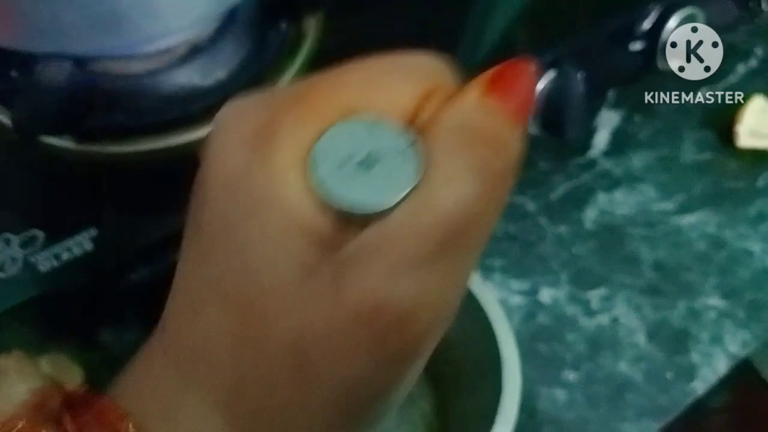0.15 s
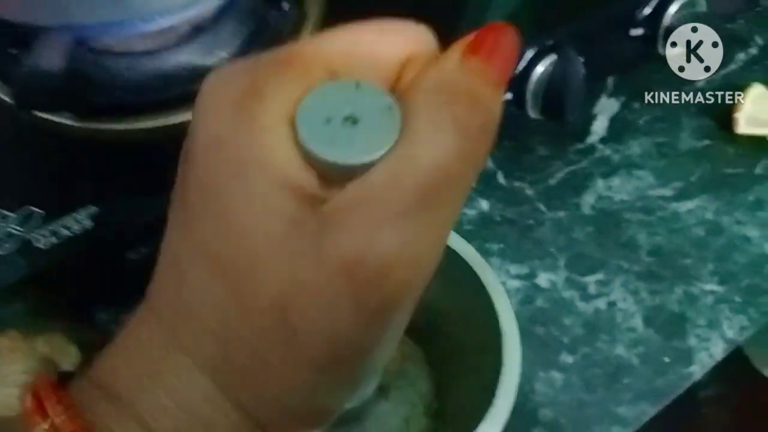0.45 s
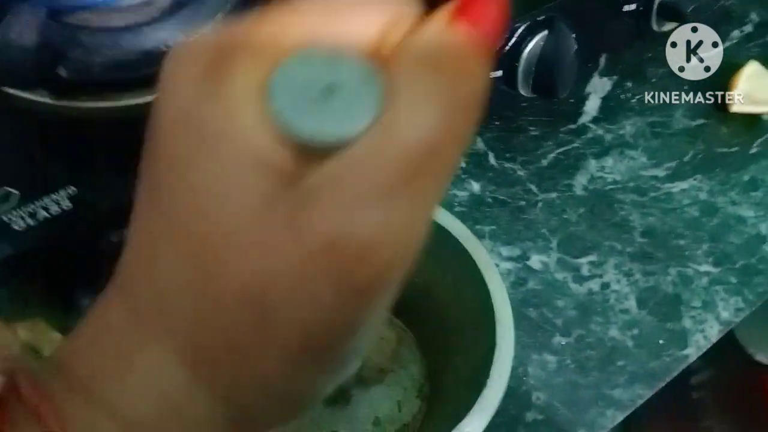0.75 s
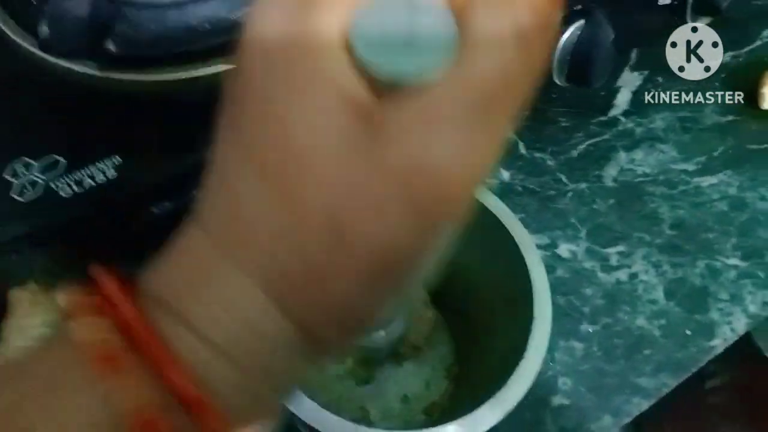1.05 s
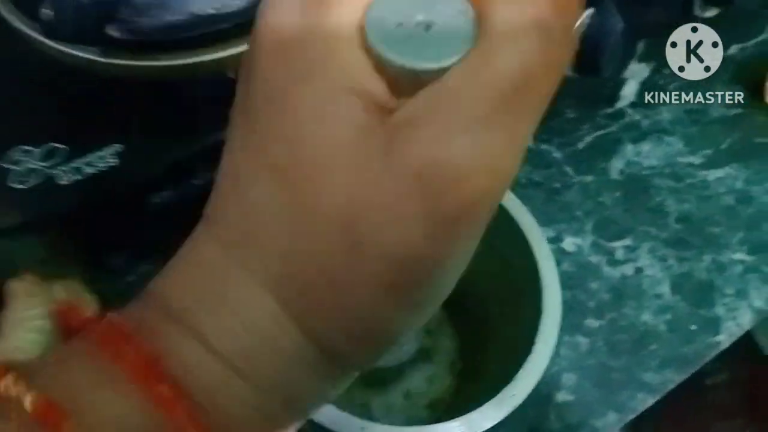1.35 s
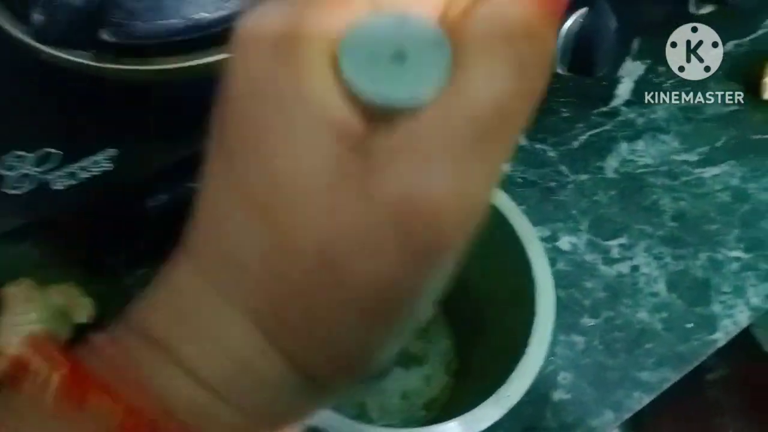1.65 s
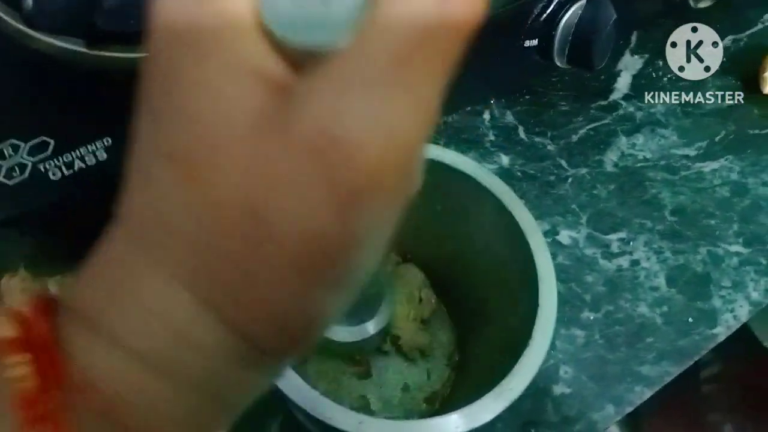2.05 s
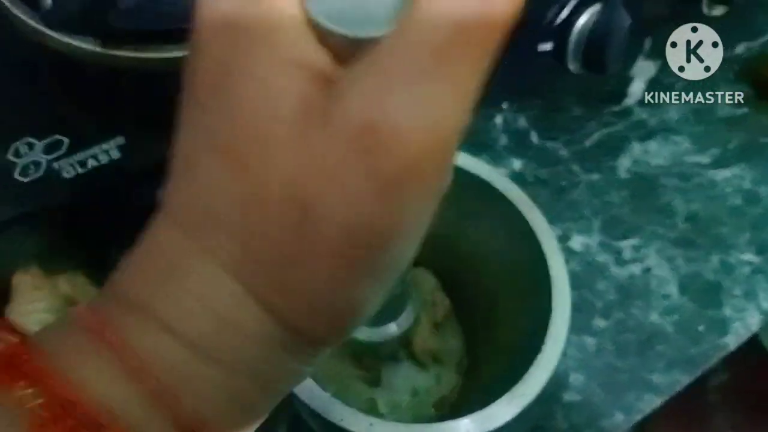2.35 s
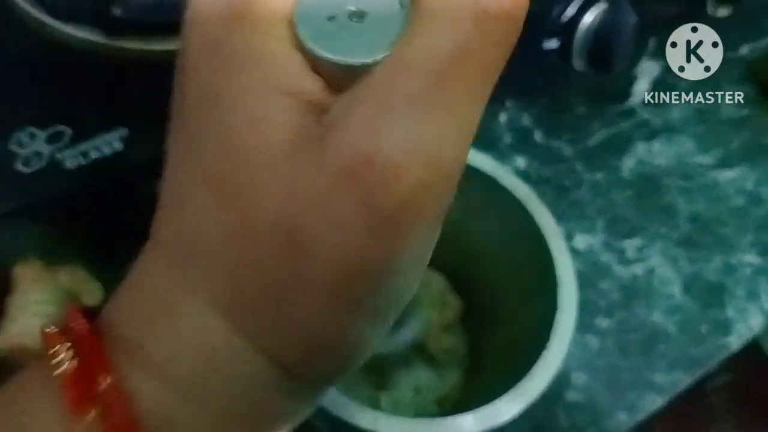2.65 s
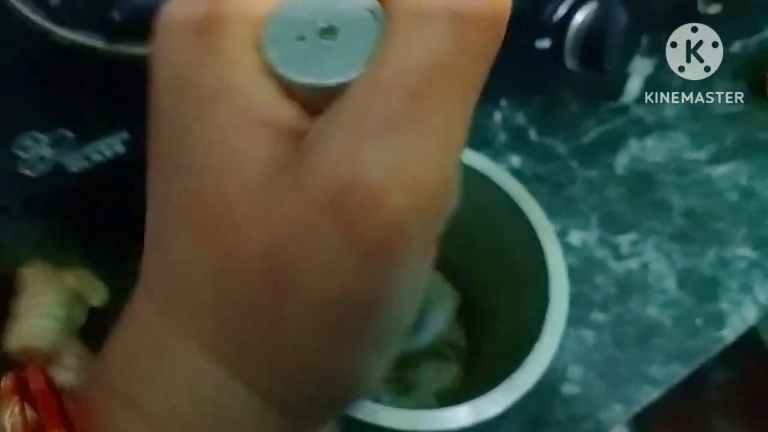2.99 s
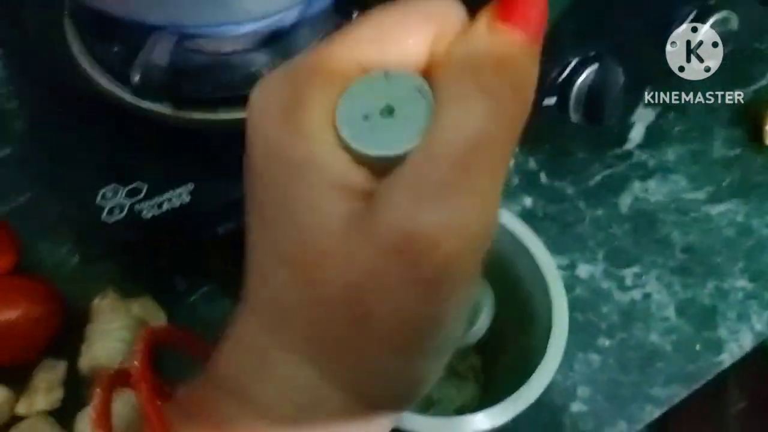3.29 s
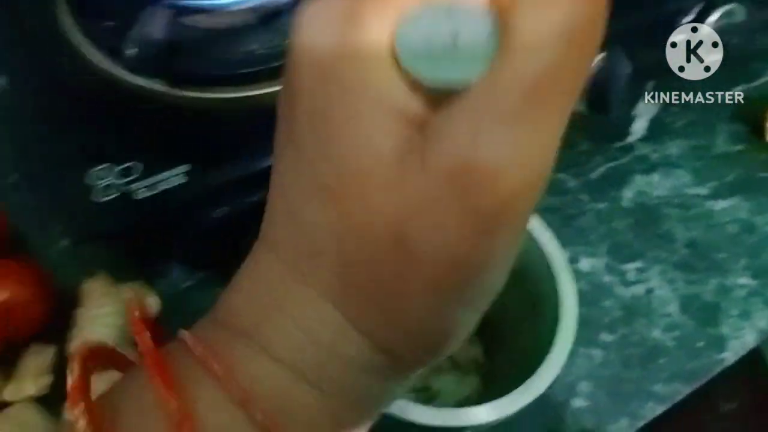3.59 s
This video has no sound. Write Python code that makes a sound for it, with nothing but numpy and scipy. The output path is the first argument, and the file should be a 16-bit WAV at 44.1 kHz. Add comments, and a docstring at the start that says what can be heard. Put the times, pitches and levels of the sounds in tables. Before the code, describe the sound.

Pestle blows knock and crunch ginger in a mortar, three a second, in a hard-walled kitchen

```python
"""Pounding ginger in a kitchen

A metal pestle pounds ginger in a metal mortar on a stone counter, about three blows a second.
Each blow is a noisy crunch of a few milliseconds, then a clack and the fading tones of mortar, base and counter.
Bangles on the pounding wrist clink as sets of high fading tones; a rub and short faint ticks are shaped noise.
Decaying noise gives the echo of the hard-walled kitchen, and a steady soft noise makes its background hush."""
import sys
import numpy as np
from scipy import signal
from scipy.fft import rfft, irfft
from scipy.io import wavfile
from scipy.ndimage import uniform_filter1d

SR = 44100
rng = np.random.default_rng(int(sys.argv[2]) if len(sys.argv) > 2 else 0)


def pcm_store(signal):
    """Save signal as 16-bit PCM."""
    levels = np.round(np.clip(np.atleast_2d(signal), -1, 1) * 32767)
    wavfile.write(sys.argv[1], SR, levels.astype(np.int16).T)


N = 165375
T = np.arange(SR) / SR   # one second of time, in s

# All mode and spectrum levels below are relative; each sound is scaled afterwards.
# background hush, spectrum: f/Hz, level per Hz/dB
HUSH_SPECTRUM = [(25, -22), (50, -7), (80, 5.5), (200, 6), (400, 4.5), (900, -2.5), (2000, -9), (4000, -15),
                 (6000, -23.5), (8300, -16), (10500, -27.5), (15000, -24.5)]
# kitchen echo: f/Hz, level against the direct sound/dB, time to fall 60 dB/s
ROOM = [(70, -10.5, 0.59), (176, -12, 0.6), (365, 3, .56), (670, -3, 0.41), (1270, -0.5, 0.37),
        (2363, 1, 0.48), (3000, -.5, 0.5), (4100, -8.5, 0.4), (5770, -15, 0.28), (8200, -9.5, 0.33),
        (14000, -13.5, 0.12)]
# modes (natural tones) of the counter: f/Hz, level/dB, time to fall 60 dB/s
COUNTER_MODES = [(79.5, -10, 0.53), (108.5, -10, 0.65), (128.4, -3.5, 0.428), (146.7, 3, 0.31),
                 (187.37, -2, 0.65), (205.7, -10.5, 0.55)]
# modes of the mortar's base against the counter: f/Hz, level/dB, time to fall 60 dB/s
BASE_MODES = [(196.3, -1, 0.21), (275, -3, 0.14), (320.6, 0.5, 0.11), (363, -6.5, 0.092), (415.4, -7, 0.17),
              (478.6, -3, 0.064)]
# modes of the mortar, damped by ginger and hand: f/Hz, level/dB, time to fall 60 dB/s
MORTAR_MODES = [(616.6, 6, 0.02), (738, 9.5, 0.018), (844, -2, 0.044), (929.6, -7, 0.054),
                (1009, 0.5, 0.037), (1250, -15, 0.076), (1257, -8, 0.052), (1597, -14, 0.069),
                (1852, -8.5, 0.2), (2050, -4.5, 0.04), (2257, 2.5, 0.013), (2680, -8.5, 0.038),
                (2976, -3.5, 0.019), (3500, -9.5, 0.023)]
# modes of the two bangles: f/Hz, level/dB, time to fall 60 dB/s
SMALL_BANGLE_MODES = [(4592, -25, .25), (8120, -9, 0.056), (8450, 2.5, 0.057), (8540, -6, 0.14),
                      (8700, -13, 0.053), (13750, -17, .17), (13660, -4.5, 0.049), (13980, -21.5, 0.12)]
LARGE_BANGLE_MODES = [(3820, -10.5, 0.083), (4470, -8, 0.12), (7294, 0, 0.073), (7280, -6, .18),
                      (11710, -11, 0.13)]
# touches of the bangles: t/s, small bangle level/dB, large bangle level/dB, extra level of high partials/dB
CLINKS = [(0.001, -33.5, -55, -5), (0.053, -44, -44, 3), (0.2537, -16.5, -28.5, 8.5),
          (0.2877, -38, -37, -5), (0.4025, -34, -32.5, 3.5), (0.5275, -23.5, -33.5, -13),
          (0.559, -42, -30, -7), (0.6027, -61, -42, -7), (0.7063, -57, -54, -2.5), (0.7686, -43, -40, 2),
          (0.8485, -45.5, -44.5, 0), (1.049, -46, -40, -4), (1.061, -37, -62, 6), (1.4546, -41, -36.5, -11),
          (1.7372, -32.5, -39, -4), (1.795, -42, -46, -8), (2.036, -38, -47, -13),
          (2.2164, -29.5, -38, 1.5), (2.2653, -39.5, -51, -8), (2.5291, -41.5, -45.5, -13),
          (2.6403, -43, -58, 11), (3.03, -33.5, -45, 3.5)]
# the pestle drags on the mortar wall as it lifts: t/s, length/s, level/dB
DRAGS = [(2.123, 0.16, -44.5)]
# spectrum of that rub: f/Hz, level per Hz/dB
DRAG_SPECTRUM = [(300, 1), (600, 3), (810, 3.5), (1100, -6), (1500, -9), (2050, -8), (2900, -16),
                 (4000, -15), (9000, -52)]
# short ticks: the pestle's first touch just before the fourth blow, then one small tick: t/s, level/dB
TICKS = [(1.0901, -31), (3.283, -51)]
# ginger fibres tearing, spectrum: f/Hz, level per Hz/dB
CRUNCH_SPECTRUM = [(300, -20), (1500, 0), (3000, -6), (4400, 3), (5800, -5.5), (7000, -4), (8400, 1),
                   (10300, -15), (12500, -6.5), (14500, -2.5), (16000, -20)]
# pestle blows: t/s, counter thud level/dB, base knock level/dB, mortar ring level/dB,
# clack level/dB, clack pitch f/Hz, crunch level/dB, crunch half-width/s
BLOWS = [(0.202, -14.5, -14, -12, -17, 1700, -22.5, 0.0038),
         (0.5102, -14, -14.5, -15, -17, 1780, -20, 0.0023),
         (0.7891, -30.5, -28.5, -24, -25, 716, -22, 0.0027),
         (1.0928, -19.5, -28, -22, -25, 2670, -21, 0.0023),
         (1.3951, -22, -31.5, -26, -20, 4100, -30.5, 0.0029),
         (1.7108, -23.5, -29.5, -28, -15, 3990, -27, 0.0023),
         (2.013, -30, -32.5, -23.5, -22, 2590, -24, 0.0029),
         (2.3164, -17.5, -32.5, -26.5, -25, 2100, -21.5, 0.0021),
         (2.6199, -17.5, -17.5, -21, -26, 2330, -21, 0.0029),
         (2.9129, -22, -19.5, -21.5, -34.5, 2880, -24, 0.0045),
         (3.1761, -19.5, -30, -23.5, -29, 1944, -28, 0.0035),
         (3.4450, -32.5, -28, -21, -26, 1680, -32.5, 0.0041),
         (3.7472, -20, -27, -35.5, -41, 2770, -25.5, 0.0014)]

HUSH_DB = -50
ROOM_BUILD_S, EARLY_DB, EARLY_T60_S = 0.0032, -6, 0.24   # time constant of the onset; the early echoes
BANGLE_ROOM_DB = -1.5   # bangles sent into the echo, against the mortar
UPPER_PARTIALS_HZ = 10000
CLINK_RISE_S, CLINK_TICK_DB = 0.00026, -20   # tick level is against the small bangle
LEVEL_WINDOW_S = 0.012   # short sounds are levelled as if their energy filled this time
LOAD_DETUNE = 0.011   # spread of the mortar's and base's pitches as the ginger shifts, as a fraction
MODE_SPREAD_DB, CONTACT_S = 0.5, 0.00041   # mortar: chance in mode strength; time constant of the onset
BODY_CONTACT_S = 0.0028   # the base and counter start more softly
CLACK_CYCLES = 0.42   # time constant of the clack, in cycles of its pitch
CLACK_GRIT_DB, CLACK_GRIT_S = -5.5, 0.0013   # grit level against the clack tone; decay time constant
CLACK_GRIT_REACH_HZ = 710   # how far the grit extends above the clack's pitch
CRUNCH_GRAIN_DB, FIRST_TOUCH_S, FIRST_TOUCH_DB = 4, 0.005, -19
RUMBLE_CUT_HZ, CUTOFF_HZ, OVERLOAD = 25.5, 16645, 1   # OVERLOAD is the ceiling of the rounded peaks


def from_db(db):
    """Turn decibels into a gain."""
    return 10 ** (np.asarray(db) / 20)


def at_hz(points, hz, axis=1):
    """Read a table column at any frequency, in straight lines on a log-frequency axis."""
    points = np.array(points)
    return np.interp(np.log(np.maximum(hz, 1)), np.log(points[:, 0]), points[:, axis])


def at_level(x, db):
    """Scale a short sound to the energy of a burst at this level, LEVEL_WINDOW_S long."""
    energy = np.sum(x ** 2) + 1e-20
    return x * from_db(db) * np.sqrt(LEVEL_WINDOW_S * SR / energy)


def add(out, s, x):
    """Mix a sound in at time s."""
    i = max(int(s * SR), 0)
    out[i:i + len(x)] += x[:max(len(out) - i, 0)]


def onset(rise_s):
    """Rise smoothly from silence with this time constant."""
    return 1 - np.exp(-T / rise_s)


def coloured(x, spectrum):
    """Filter a noise by a spectrum, then scale it to an rms of 1."""
    gain = from_db(at_hz(spectrum, np.fft.rfftfreq(len(x), 1 / SR)))
    y = irfft(rfft(x) * gain, len(x))
    return y / y.std()


def evened(x, width_hz):
    """Level the chance peaks and dips of a noise's spectrum that are wider than this."""
    spectrum = rfft(x, 2 * SR)   # padded, so two bins per Hz
    power = uniform_filter1d(np.abs(spectrum) ** 2, max(int(2 * width_hz), 1))
    return irfft(spectrum / np.sqrt(np.abs(power) + 1e-9 * power.max()))[:SR]


def ring(modes, spread_db, detune=0):
    """Add up fading sine tones, with chance in their strength, sign and (if detuned) pitch."""
    hz, db, t60 = np.transpose(modes)[:, :, None]
    strength = from_db(db + spread_db * rng.standard_normal(db.shape))
    strength = strength * rng.choice([-1, 1], db.shape)
    hz = hz * (1 + detune * rng.standard_normal(hz.shape))
    fade = np.exp(-np.log(1000) * T / t60)   # down 60 dB after t60
    return np.sum(strength * np.sin(2 * np.pi * hz * T) * fade, axis=0)


def background_hush():
    """A steady noise, strongest in the bass, lies softly under everything."""
    return from_db(HUSH_DB) * coloured(rng.standard_normal(N), HUSH_SPECTRUM)


def kitchen(x):
    """Echo the sound with noise: dense early reflections and a tail that dies band by band."""
    hz = np.fft.rfftfreq(SR, 1 / SR)
    white = rfft(rng.standard_normal(SR))
    response = 0
    edges = np.geomspace(20, 22000, 25)
    early = from_db(EARLY_DB - 60 * T / EARLY_T60_S)
    for low, high in zip(edges, edges[1:]):
        tail = from_db(-60 * T / at_hz(ROOM, np.sqrt(low * high), axis=2))
        band = irfft(white * ((hz >= low) & (hz < high)), SR)
        response = response + band * (tail + early)
    build = onset(ROOM_BUILD_S)
    even = evened(response * build, width_hz=27)
    response = irfft(rfft(even) * from_db(at_hz(ROOM, hz)), SR)
    end_fade = np.minimum(1, 10 * T[::-1])   # over the last 0.1 s
    return signal.fftconvolve(x, response * build * end_fade)[:N]


def lingering():
    """Counter and room still ring from the blow before: fading tones and noise at the start."""
    out = np.zeros(N)
    spectrum = [(60, -24), (200, 15), (800, 5.5), (2200, -3), (4000, -15), (9000, -43)]   # f/Hz, level/dB
    tail = coloured(rng.standard_normal(SR), spectrum) * from_db(-60 * T / 0.48)
    counter = at_level(ring(COUNTER_MODES, spread_db=3.5), -24.5)
    add(out, 0, from_db(-32) * tail + counter)
    return out


def bangles():
    """Two bangles touch with a noisy tick and ring; each touch sets its own upper partials."""
    out = np.zeros(N)
    for s, small_db, large_db, upper_db in CLINKS:
        modes = []
        for bangle, level_db in ((SMALL_BANGLE_MODES, small_db), (LARGE_BANGLE_MODES, large_db)):
            for hz, db, t60 in bangle:
                extra_db = upper_db * (hz > UPPER_PARTIALS_HZ)
                modes.append((hz, db + level_db + extra_db, t60))
        tick = coloured(rng.standard_normal(SR), [(3000, -36), (8000, -10), (15000, -10)])   # f/Hz, level/dB
        tick = from_db(small_db + CLINK_TICK_DB) * tick * np.exp(-T / 0.0035)
        clink = ring(modes, spread_db=2.65, detune=0.00038) + tick
        add(out, s, clink * onset(CLINK_RISE_S))
    return out


def handling():
    """The pestle rubs the wall as a swell of noise; short faint ticks are tiny noise bursts."""
    out = np.zeros(N)
    for s, length, db in DRAGS:
        rub = coloured(rng.standard_normal(SR), DRAG_SPECTRUM)
        swell = np.sin(np.pi * np.minimum(T / length, 1))
        add(out, s, from_db(db) * rub * swell)
    for s, db in TICKS:
        tick = coloured(rng.standard_normal(SR), CRUNCH_SPECTRUM) * np.exp(-T / 0.00032)
        add(out, s, at_level(tick, db))
    return out


def crunch(half_width):
    """Fibres give way: a faint first touch, then a burst of tiny snaps of uneven strength."""
    t = T - FIRST_TOUCH_S
    grain_db = CRUNCH_GRAIN_DB * np.minimum(rng.exponential(1, SR), 4)
    snaps = rng.standard_normal(SR) * from_db(grain_db)
    burst = np.exp(-np.abs((t - 0.0006) / half_width) ** 4.1)
    first_touch = from_db(FIRST_TOUCH_DB) * (t < 0)
    return coloured(snaps, CRUNCH_SPECTRUM) * (burst + first_touch)


def clack(hz):
    """The pestle bottoms out: a tone that dies within a few cycles, with gritty noise around it."""
    age = T * hz / CLACK_CYCLES
    tone = age ** 2 * np.exp(-age) * np.sin(2 * np.pi * hz * T)
    grit = rng.standard_normal(SR) * (1 - np.exp(-age)) * np.exp(-T / CLACK_GRIT_S)
    grit = evened(grit, width_hz=60)
    band = [hz * 0.48, min(hz + CLACK_GRIT_REACH_HZ, SR / 3)]
    grit = signal.sosfilt(signal.butter(3, band, "band", fs=SR, output="sos"), grit)
    return at_level(tone, 0) + at_level(grit, CLACK_GRIT_DB)


def pounding():
    """Every blow crunches, clacks, and rings the mortar, its base and the counter."""
    out = np.zeros(N)
    for s, thud_db, base_db, ring_db, clack_db, clack_hz, crunch_db, crunch_s in BLOWS:
        add(out, s - FIRST_TOUCH_S, at_level(crunch(crunch_s), crunch_db))
        add(out, s, at_level(clack(clack_hz), clack_db))
        mortar = ring(MORTAR_MODES, spread_db=MODE_SPREAD_DB, detune=LOAD_DETUNE) * onset(CONTACT_S)
        add(out, s, at_level(mortar, ring_db))
        base = ring(BASE_MODES, spread_db=1.1, detune=LOAD_DETUNE) * onset(BODY_CONTACT_S)
        add(out, s, at_level(base, base_db))
        counter = ring(COUNTER_MODES, spread_db=0.5) * onset(BODY_CONTACT_S)
        add(out, s, at_level(counter, thud_db))
    return out


def scene():
    """Mix pounding and bangles with their kitchen echo, over a faint hush."""
    mortar = pounding() + handling()
    wrist = bangles()
    room = kitchen(mortar + from_db(BANGLE_ROOM_DB) * wrist)
    return (mortar + wrist + room + lingering() + background_hush())[None]


def record(dry):
    """Cut the rumble, round the peaks, then cut the top."""
    rumble_cut = signal.butter(2, RUMBLE_CUT_HZ, "high", fs=SR, output="sos")
    x = signal.sosfilt(rumble_cut, dry)
    rounded = OVERLOAD * np.tanh(x / OVERLOAD)
    top_cut = signal.cheby2(16, 60, CUTOFF_HZ, fs=SR, output="sos")   # 60 dB down from CUTOFF_HZ up
    return signal.sosfilt(top_cut, rounded)


dry = scene()
out = record(dry)
pcm_store(out)
```